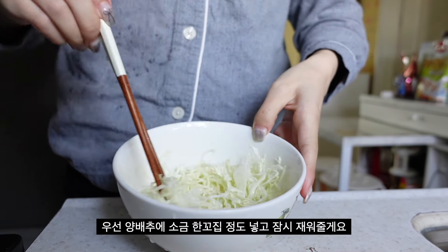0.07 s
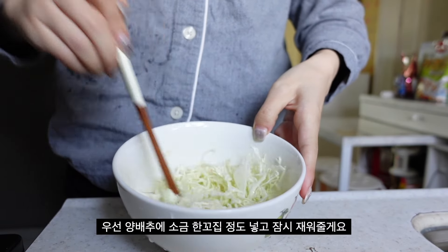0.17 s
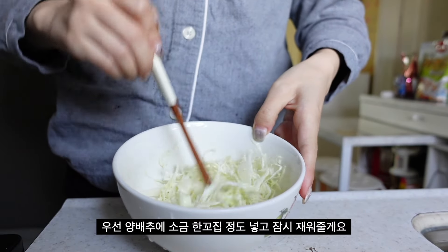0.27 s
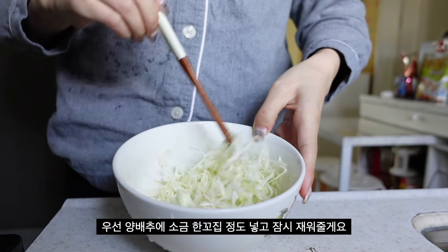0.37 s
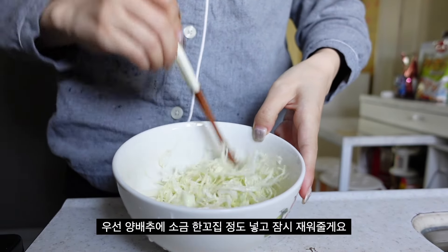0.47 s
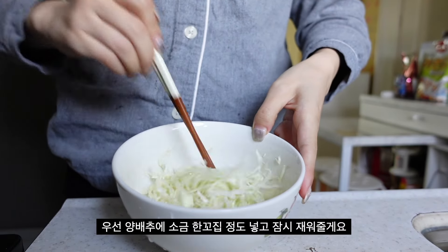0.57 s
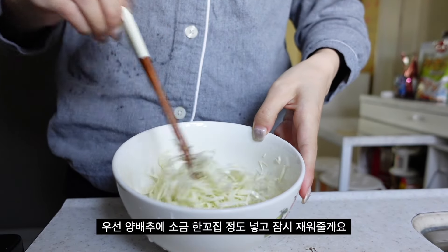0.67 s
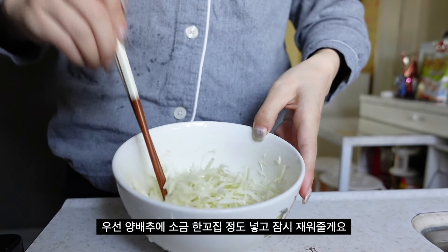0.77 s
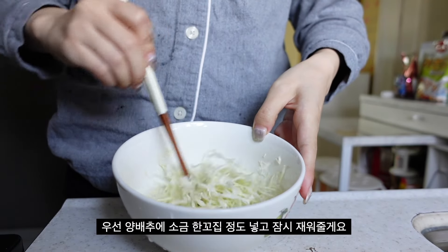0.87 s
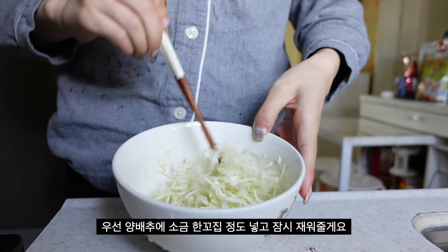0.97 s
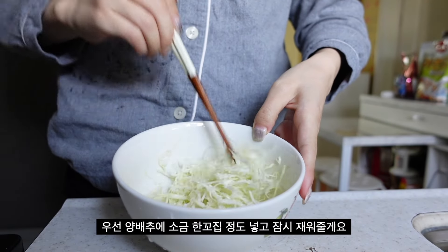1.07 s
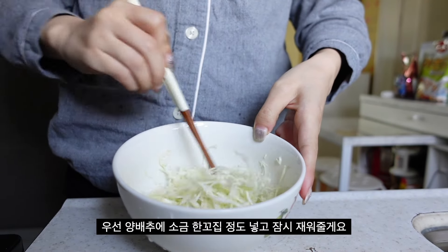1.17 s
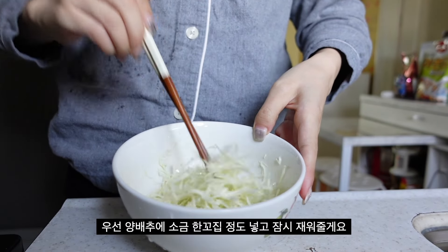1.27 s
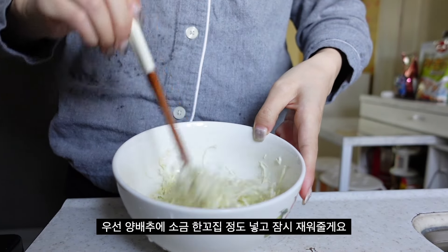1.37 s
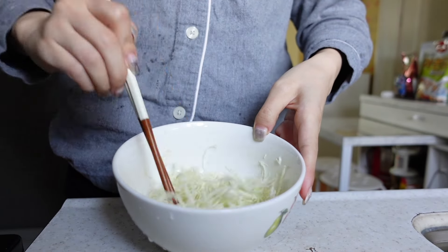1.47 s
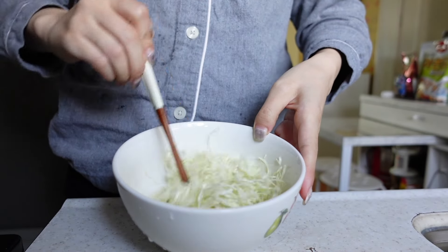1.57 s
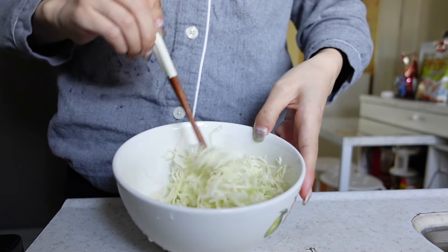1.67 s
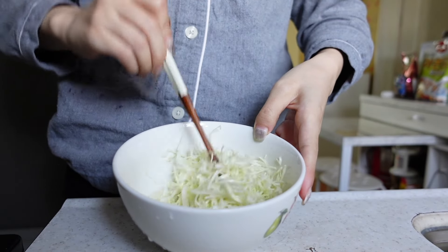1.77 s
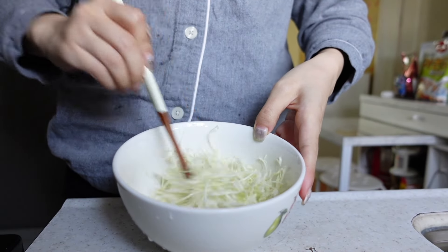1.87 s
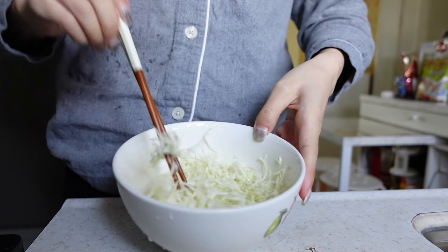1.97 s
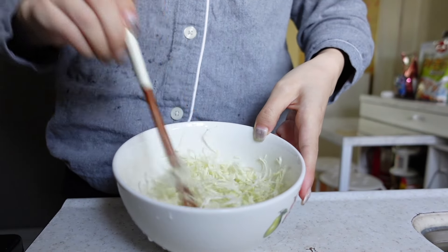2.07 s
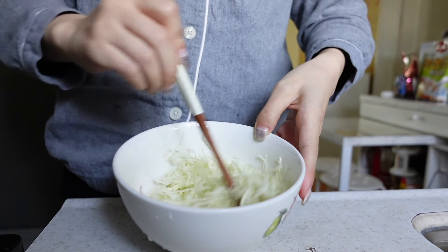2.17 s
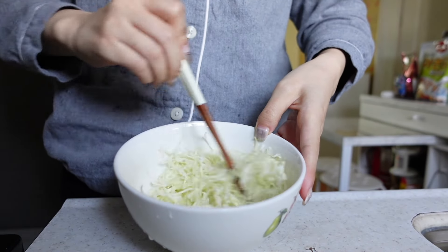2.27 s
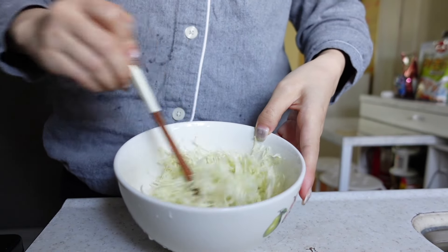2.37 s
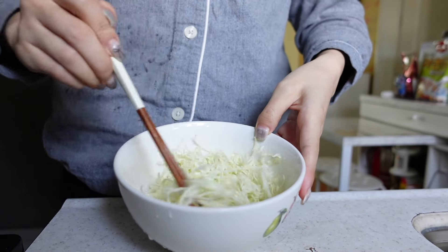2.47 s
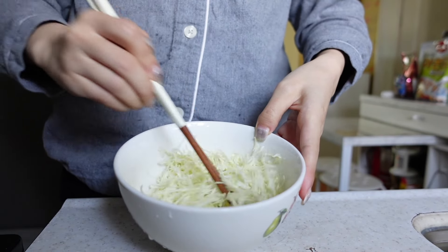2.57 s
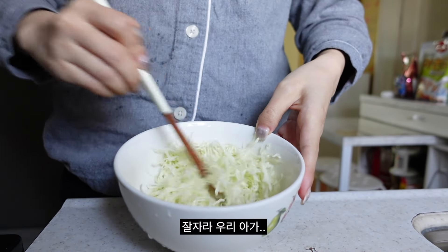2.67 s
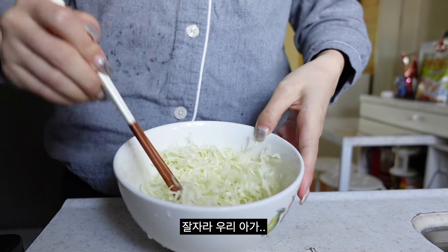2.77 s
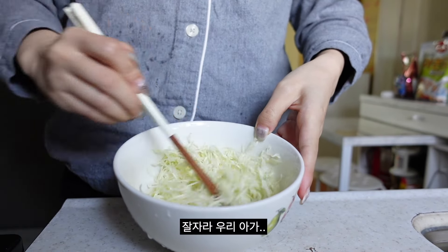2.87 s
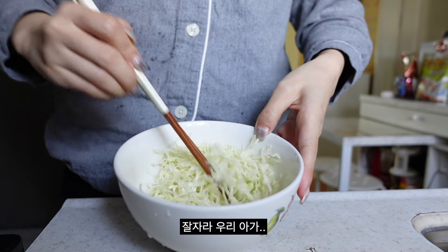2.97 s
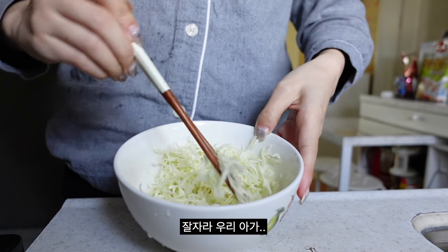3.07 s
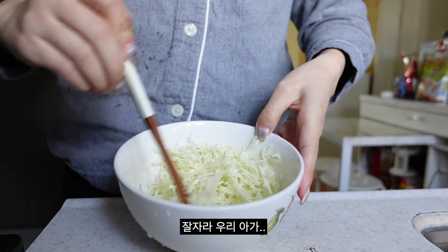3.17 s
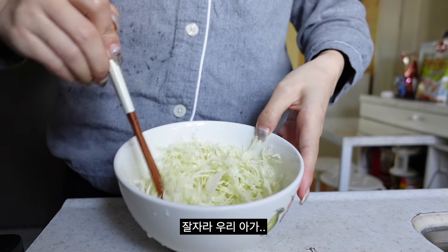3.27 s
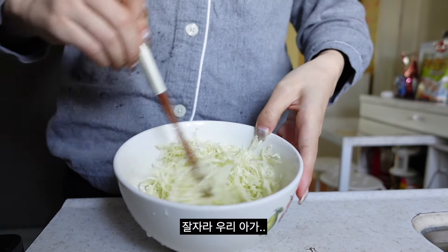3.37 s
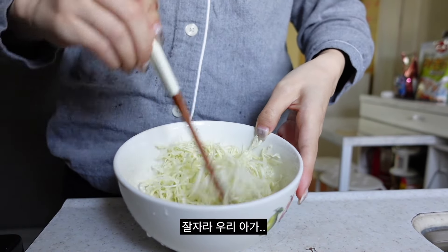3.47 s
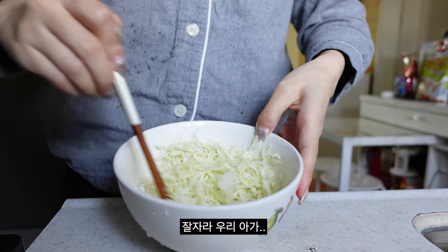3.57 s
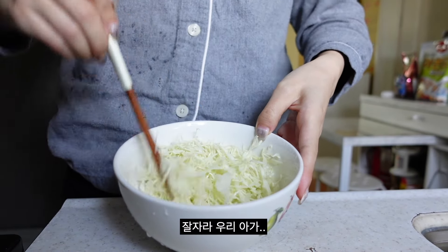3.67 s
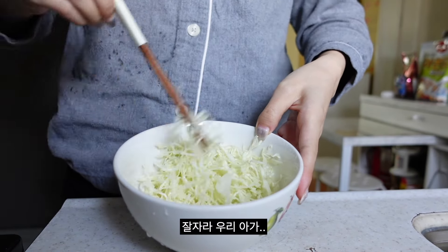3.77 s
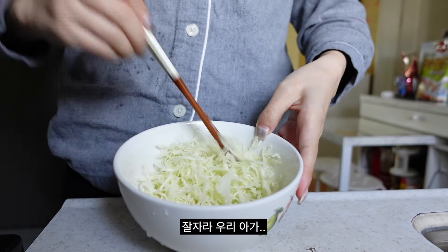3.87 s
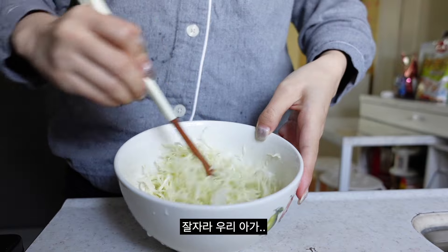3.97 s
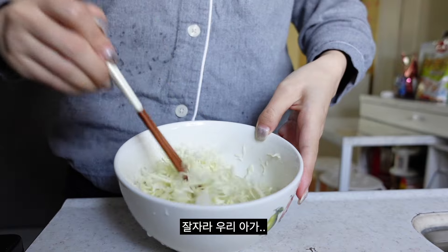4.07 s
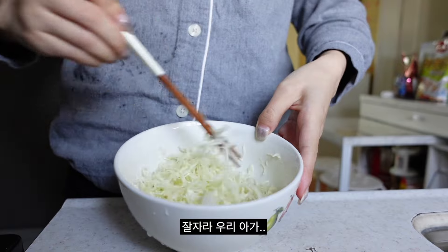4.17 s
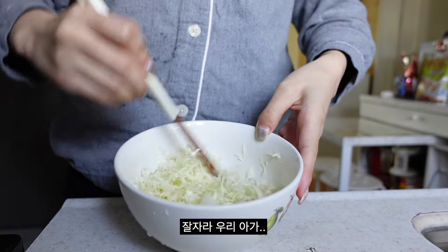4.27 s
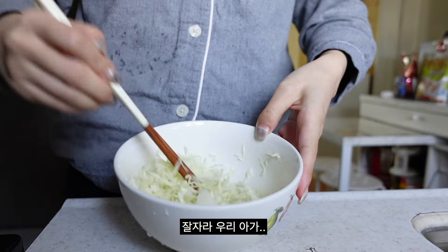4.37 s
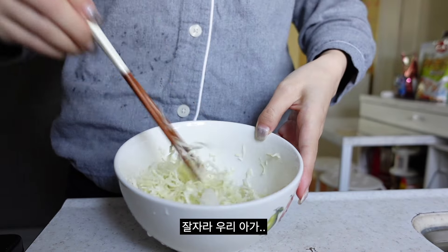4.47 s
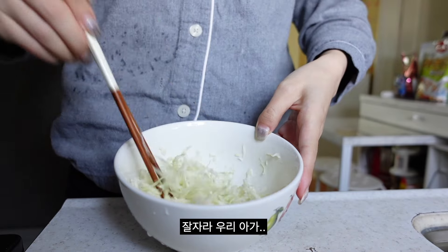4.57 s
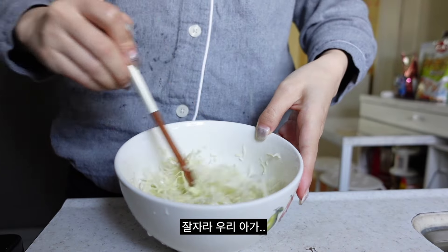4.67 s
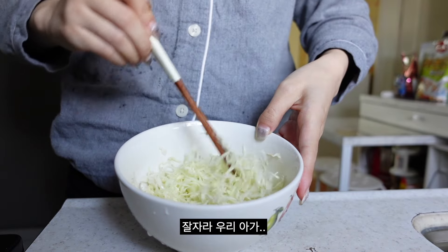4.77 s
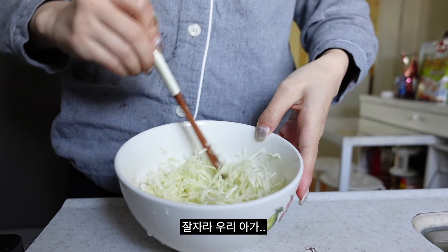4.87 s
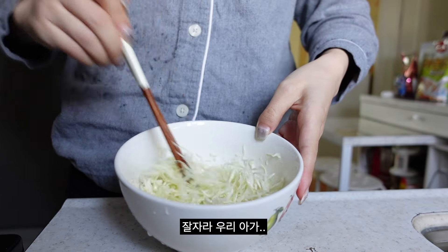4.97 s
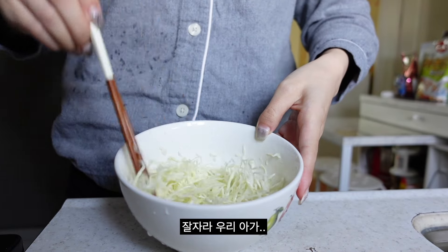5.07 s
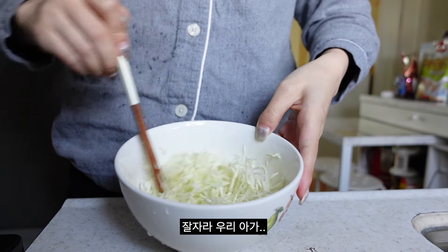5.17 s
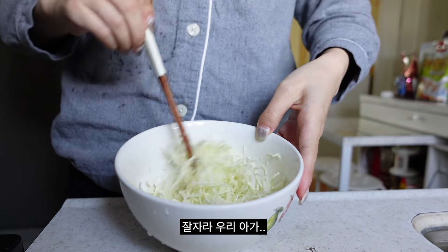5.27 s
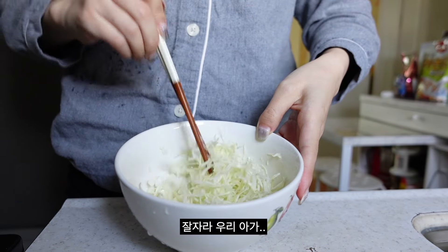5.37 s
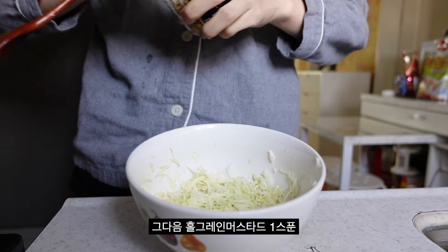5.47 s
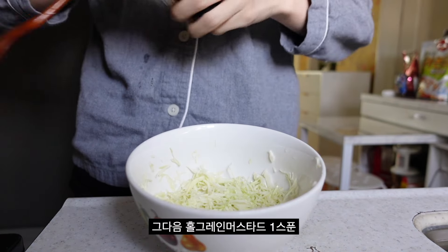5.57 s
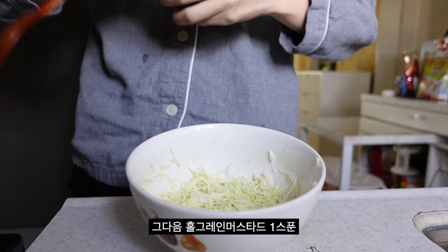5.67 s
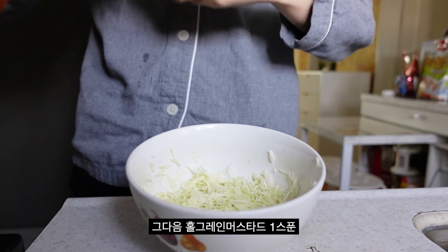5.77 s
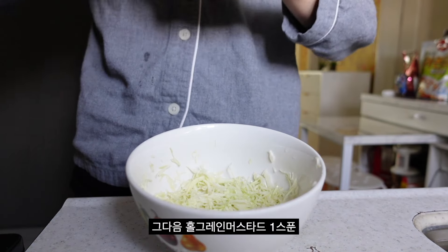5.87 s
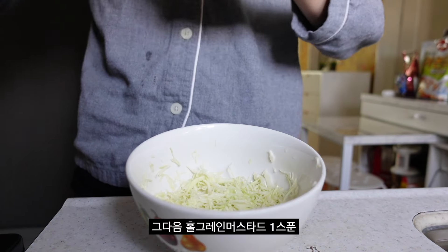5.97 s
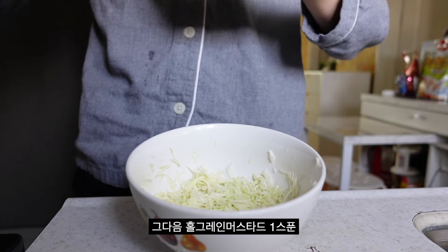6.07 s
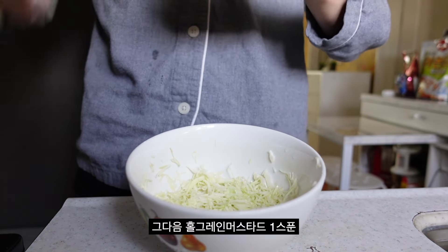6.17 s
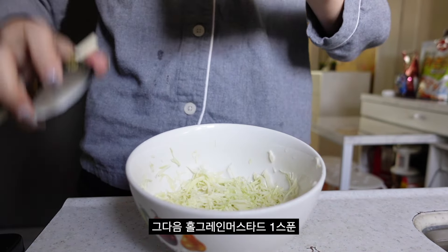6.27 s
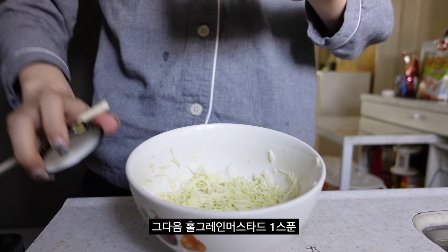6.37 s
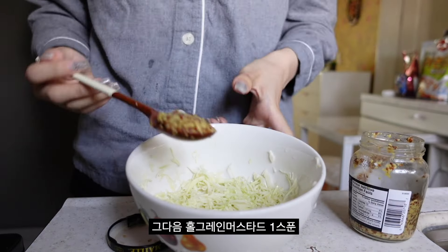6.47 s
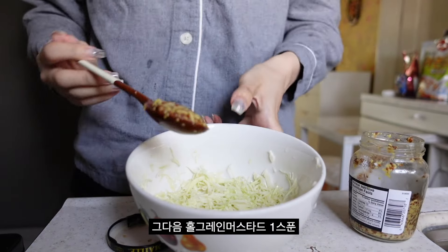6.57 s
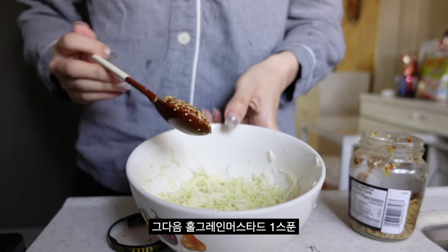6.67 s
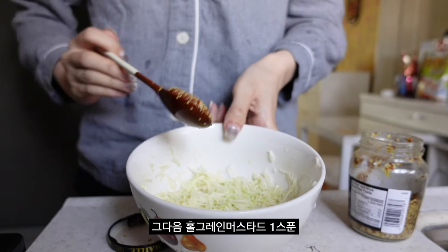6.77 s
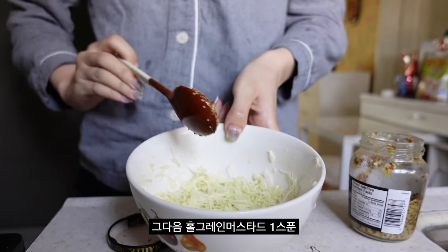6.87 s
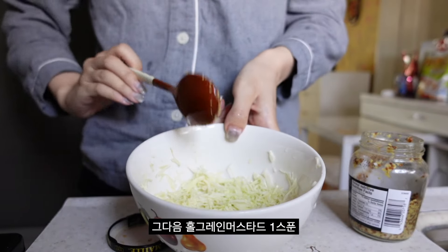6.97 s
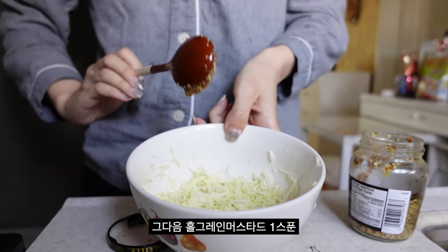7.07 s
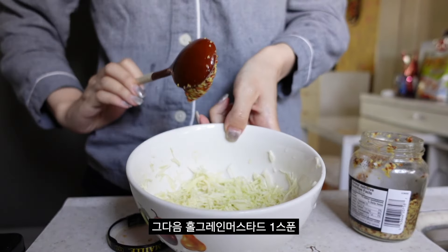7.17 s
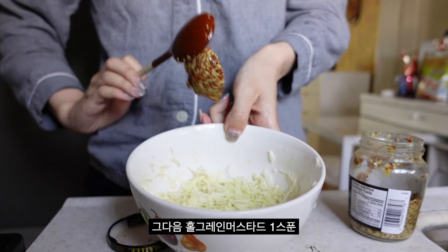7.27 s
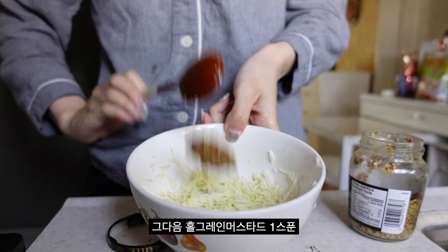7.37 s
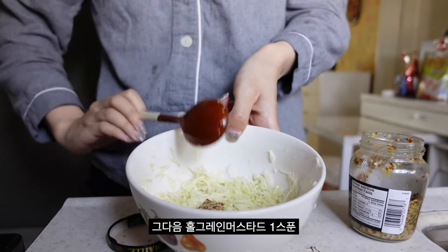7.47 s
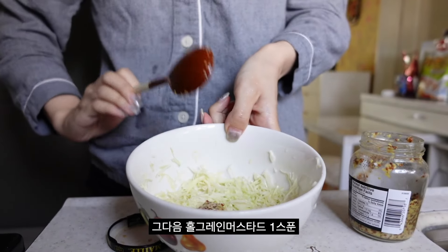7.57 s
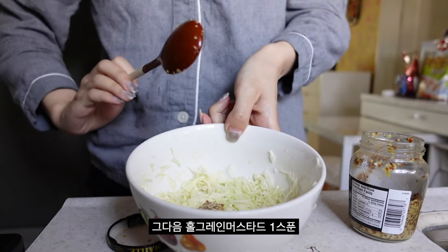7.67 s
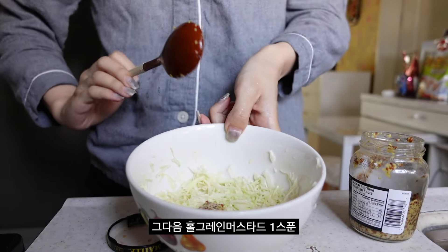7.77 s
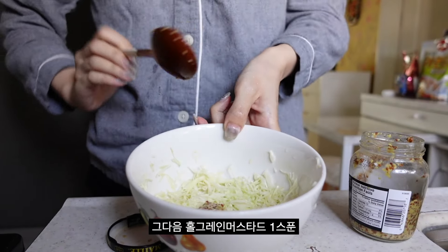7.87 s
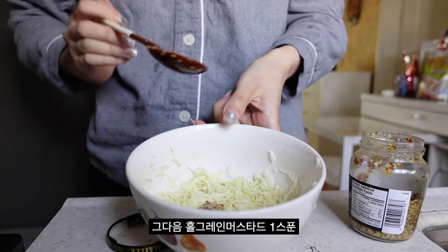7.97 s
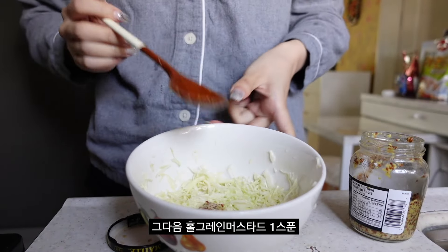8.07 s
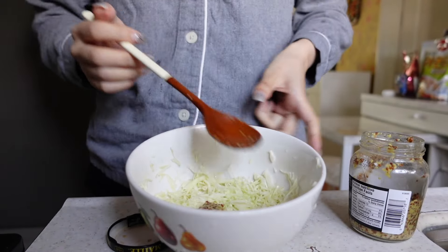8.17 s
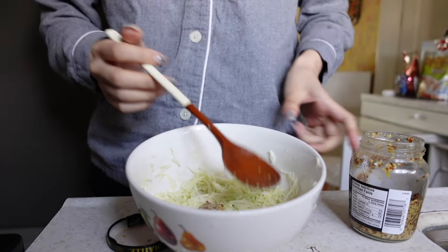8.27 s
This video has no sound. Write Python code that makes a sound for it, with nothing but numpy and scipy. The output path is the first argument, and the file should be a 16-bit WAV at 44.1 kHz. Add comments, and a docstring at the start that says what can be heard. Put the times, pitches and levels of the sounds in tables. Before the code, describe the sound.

A close stereo microphone in a small kitchen, with a low wavering refrigerator hum throughout. From 0 to 5.4 seconds chopsticks toss shredded cabbage in a ceramic bowl: roughly three uneven strokes a second, each a soft crisp crackling swish with faint table rumble. Stick tips tick lightly on the glaze; firmer knocks with short damped ringing and a low thump come near 0.9, 2.9 and 3.2. The bowl's foot skids faintly between 2.2 and 3. At 5.44 the tossing stops abruptly. A jar lid twists at 5.6, loud, metallic and gritty with clustered hollow snaps, then again, weaker and higher, at 5.75 to 5.9. Then mostly fridge hum, with very faint short hollow blips around 6.7, 6.9, 7.2 and 7.7. At 7.5 a spoon knocks the rim once, a clear ceramic clink with a dull table thump and short room echo. Hum continues to about 8.3.

```python
"""Chopsticks toss shredded cabbage in a ceramic bowl: grain noise crackles through air resonances and snips,
stick tips are noise bursts plus ringing modes of bowl and table top, and the bowl's foot skids.
A jar lid is twisted off (grit and snaps through lid and hollow resonances), short soft tones sound,
a spoon knocks the rim. Behind it a fridge hums (wavering sines over coloured noise) in a small kitchen,
heard by a close stereo microphone in two shots with a hard cut after the toss."""
import sys
import numpy as np
from scipy import signal
from scipy.fft import rfft, irfft
from scipy.io import wavfile
from scipy.ndimage import uniform_filter1d

SR = 44100
rng = np.random.default_rng(int(sys.argv[2]) if len(sys.argv) > 2 else 0)


def persist_wave(psi):
    """Save psi, clipped to +-1, as 16-bit WAV."""
    counts = np.round(np.clip(psi, -1, 1) * 32767).astype(np.int16)
    wavfile.write(sys.argv[1], SR, np.atleast_2d(counts).T)


N = 367794
T = np.arange(N) / SR

# Strokes through the shreds. Each row: start in seconds, rise in seconds, hold in seconds,
# fall in dB per second, crackle level in dB, table rumble level in dB.
STROKES = [(-0.1, 0.024, 0.053, 139, -54, -55.5), (0.16, 0.05, 0.092, 120, -54, -52.5),
           (0.454, 0.047, 0.12, 99, -59, -56), (0.741, 0.099, 0.068, 124, -54, -48.5),
           (1.11, 0.045, 0.049, 108, -54, -54), (1.386, 0.066, 0.15, 87, -60.5, -54),
           (1.772, 0.023, 0.082, 108, -55.5, -58), (2.107, 0.083, 0.22, 103, -60, -50.5),
           (2.559, 0.075, 0.06, 87, -57, -46.5), (2.854, 0.035, 0.053, 129, -55.5, -48),
           (3.163, 0.025, .2, 155, -60, -49), (3.541, 0.032, 0.13, 140, -60, -53),
           (3.887, 0.076, 0.082, 133, -56.5, -54.5), (4.281, 0.024, 0.093, 123, -58, -55),
           (4.587, 0.09, 0.022, 113, -53, -59), (4.857, 0.079, 0.02, 188, -54.5, -57.5),
           (5.052, 0.14, 0.15, 306, -60.5, -60.5), (5.381, 0.036, .03, 100, -53.5, -62)]
# Tips crushing a bunch of shreds. Each row: time of the peak in seconds, level in dB.
CRUNCHES = [(.2, -63), (.248, -46.5), (.29, -62), (.4, -64), (0.486, -60), (.512, -55), (.598, -58),
            (1.475, -58), (1.551, -59), (1.6, -58), (1.856, -51), (1.9, -67), (1.952, -58.5), (2.165, -65),
            (2.39, -58), (3.369, -57), (3.57, -80), (4.072, -61), (4.69, -60), (4.97, -48), (5.301, -55.5),
            (5.349, -54.5)]
# Crackle spectrum of the shreds. Each row: frequency in Hz, relative level in dB per Hz.
SHRED_SPECTRUM = [(760, -72), (1300, -14), (1700, -8.5), (1850, -5), (2420, -6.5), (3520, -11), (3780, -5),
                  (4110, -12), (5610, -2.5), (6100, -7.5), (7580, -7.5), (11600, -18.5), (15500, -29.5)]
# Air in the bowl and between the shreds. Each row: frequency in Hz, width in Hz, gain in dB.
AIR_PEAKS = [(2413, 128, 11), (2444, 170, -1), (3740, 31, -2.5), (5570, 840, 0), (7180, 65, 0)]
# Stick tips on the glaze. Each row: time in seconds, tick level in dB, table thump level in dB,
# bowl ring level in dB.
TAPS = [(0.2472, -50, -38.5, -78), (0.2883, -50, -57, -73), (0.4014, -43.5, -66, -76),
        (0.5831, -39.5, -60, -85), (0.63, -40, -70, -83), (0.8622, -27, -31.5, -50.5),
        (1.1521, -41, -47.5, -71), (1.215, -40, -61, -72), (1.8005, -42, -65, -77),
        (2.2269, -48.5, -44, -62), (2.2573, -42, -67, -76), (2.6726, -42, -37, -65),
        (2.873, -28, -31.5, -55), (2.9393, -44, -65, -69), (3.1743, -28.5, -36.5, -47.5),
        (3.5674, -48, -39.5, -78), (3.6013, -45.5, -53, -67), (3.8012, -43.5, -66, -78),
        (3.9407, -39, -43.5, -69), (4.3044, -42.5, -49, -58), (4.6229, -47.5, -59, -69),
        (4.9242, -54, -47, -82), (5.4086, -64, -54, -80)]
# Spectrum of a tick. Each row: frequency in Hz, gain in dB.
TICK_SPECTRUM = [(400, -27.5), (1000, -11), (2400, -5.5), (3500, -13), (5000, -6.5), (7200, -2),
                 (10000, -14), (15500, -27)]
# Bowl modes. Each row: frequency in Hz, relative level in dB, T60 in seconds before damping.
BOWL_MODES = [(955, -3, .12), (983, -2, .3), (1010, -8, .2), (1087, -10, .25), (2089, -11, .2),
              (2159, -11, .2), (2573, 0, .7), (2614, -6, .4), (2654, -4, .25), (2832, -12, .3),
              (4657, -4, .45), (4690, -4, .2), (4725, -2, .15), (7278, -12, .15)]
# Table top modes. Each row: frequency in Hz, relative level in dB, T60 in seconds before damping.
TABLE_MODES = [(115, -21.5, 0.21), (152.9, -0.2, 0.23), (184, -11, 0.14), (217.6, 3.5, 0.087),
               (287, -9, 0.15), (340.5, -19, 0.27), (371.6, -13, 0.21), (466.6, -18, 0.077),
               (496, -12, 0.063), (528, -14.5, 0.099), (620.5, -24, 0.13)]
# Rattle of bowl on table. Each row: frequency in Hz, gain in dB.
THUD_SPECTRUM = [(150, -5), (300, -3), (500, 2), (900, 1.5), (1400, -15.5), (2500, -4.5), (6000, -18.5)]
# Frequencies in Hz at which the shares of the bowl ring below hold.
RING_HZ = [1000, 2600, 4700]
# Share of the ring in dB at those frequencies: tips strike low in the bowl, the spoon its rim.
INSIDE_SHARE_DB = [8.5, -45, 4.5]
RIM_SHARE_DB = [2, -0.5, -5]
# The bowl's foot skidding on the table. Each row: start in seconds, rise in seconds, hold in seconds,
# fall in dB per second, level in dB.
SKIDS = [(2.21, 0.011, 0.017, 300, -63), (2.341, .015, 0.034, 300, -59.5), (2.66, 0.012, 0.056, 300, -55.5),
         (2.894, .015, .03, 296, -63.5), (2.954, 0.016, 0.025, 300, -58.5)]
# Foot resonances. Each row: frequency in Hz, width in Hz, gain in dB.
FOOT_PEAKS = [(330, 51, 3), (544, 71, -4), (780, 96, -3.5)]
# Lid sliding on its thread. Each row: start in seconds, rise in seconds, hold in seconds,
# fall of the metal in dB per second, metal level in dB, hollow level in dB.
TWISTS = [(5.581, 0.038, 0.03, 342, -23, -28), (5.758, 0.015, 0.07, 398, -35, -34)]
# Lid snapping over the thread. Each row: time in seconds, then dB of the blow to lid, crack and hollow.
SNAPS = [(5.6084, -9, -24.5, -14), (5.6211, -12, -18, -16), (5.6289, 6.5, -29.5, 1),
         (5.647, -24, -36, -7.5), (5.6712, 4, -31, 6.5), (5.7728, -6.5, -52, -16),
         (5.79, -4.5, -51.5, -8.5), (5.8134, -5, -53.5, -37), (5.8586, 0.5, -27, -3.5),
         (5.8825, -34, -39.5, -12.5), (6.164, -55, -50, -49)]
# Lid and jar resonances. Each row: frequency in Hz, width in Hz, gain in dB.
LID_PEAKS = [(1450, 125, -11.5), (1960, 190, -14), (2478, 99, -0.5), (2730, 144, -3.5), (3260, 55, -15.5),
             (4470, 120, -8), (5200, 150, -16)]
# Jar hollow, rising as the lid lifts: one list per twist. Each row: frequency in Hz, width in Hz, gain in dB.
HOLLOW_PEAKS = [
    [(330, 170, -9), (786, 52, -3.5)],
    [(470, 65, -3.5), (877, 41, 4)],
]
# Crack spectrum. Each row: frequency in Hz, gain in dB.
CRACK_SPECTRUM = [(1000, -38), (2500, -9.5), (4500, 1.5), (6500, -10), (9000, -16.5), (15500, -33.5)]
# Spoon on the rim. Each row: time in seconds, tick level in dB, table thump level in dB, bowl ring level in dB.
SPOON = [(7.4809, -14, -18.5, -32)]
# Short hollow blips. Each row: start in seconds, level in dB, frequency in Hz.
BLIPS = [(6.709, -52, 644), (6.906, -57, 653), (6.947, -60, 630), (7.167, -56, 659), (7.671, -49.5, 644)]
# Fridge level in each shot. Each row: time in seconds, hum level in dB, motor noise level in dB.
FRIDGE_LEVELS = [(0, -53, -60.5), (5.44, -52, -60), (5.445, -74, -61), (5.6, -56.5, -57.5),
                 (6.5, -57.5, -60.5), (8.34, -57, -59)]
# Compressor lines. Each row: frequency in Hz, relative level in dB while tossing, relative level in dB afterwards.
HUM_LINES = [(59.7, -19.5, -17), (117.7, 1, 2.5), (209.5, -16.5, -16.5), (291, -11.5, -20),
             (345, -19, -37.5), (353, -27, -33), (403.5, -19.5, -31)]
# Motor noise spectrum. Each row: frequency in Hz, relative level in dB per Hz.
MOTOR_SPECTRUM = [(18, -53), (30, -30.5), (64, -17), (92, -8.5), (123, -4.5), (168, -10.5), (369, -11.5),
                  (455, -23.5), (897, -19.5), (1080, -19), (1870, -36), (2620, -34.5), (2990, -39.5),
                  (13600, -51), (15500, -56)]
# Stereo width of the motor noise. Each row: frequency in Hz, side minus mid in dB.
MOTOR_WIDTH = [(100, -63), (250, -10.5), (500, -7), (1000, 1.5), (3000, 1), (10000, -4.5)]
# Stereo lean of the direct sound. Each row: frequency in Hz, side minus mid in dB.
LEAN = [(150, -45), (300, -30), (600, -16), (1200, -19), (2500, -25), (5000, -28), (9000, -18),
        (14000, -21)]
# Stereo width of the echoes. Each row: frequency in Hz, side minus mid in dB.
ECHO_WIDTH = [(150, -38), (300, -10.5), (600, -3.5), (2500, -4), (5000, -2.5), (9000, 4.5), (14000, 4.5)]

CUT_S, LIFT_S = 5.442, 5.76  # cut to the second shot; second twist takes over the hollow
RISE_DB = 22.5  # depth of every rise
DIG_DB, DIG_S = 4.5, 0.0067  # extra crunch as the tips go in, and its fading
SLACK_DB, SLACK_AFTER_S, SLACK_S = 5, 0.038, 0.033  # a lull between the dig and the lift
CRUNCH_S = 0.0036
# the table answers each stroke
SHAKE_LAG_S, SHAKE_RISE_S, SHAKE_FALL_DB_PER_S, REST_DB = 0.035, 0.12, 81.5, -70
HOLLOW_FALL_DB_PER_S = 205
GRIT_DB = -15  # unrung part of the grit
ROOM_T60_S, TREBLE_T60_S, ROOM_DB, ROOM_SPLIT_HZ = 0.43, 0.097, -9.5, 3000
ECHO_FROM_HZ, TOP_HZ = 294, 15500


def toss():
    """Shreds crackle in patches; the tips scrape the glaze and shake the table."""
    sweep, shake = strokes()
    patchy = grains(7000, 0.23) * undb(1.6 * walk(70))
    crackle = unit(colour(patchy, SHRED_SPECTRUM))
    # every pocket of air is set off by its own crunches
    pockets = [resonate(grains(900, 3.8) * undb(4 * walk(60)), [peak_row]) for peak_row in AIR_PEAKS]
    air = unit(sum(pockets))
    scrape = grains(60, 7.2) * sweep
    glaze = unit(signal.fftconvolve(scrape, ring(BOWL_MODES, 0, damp=0.53))[:N])
    shaking = grains(600, 3.3)
    table = unit(signal.fftconvolve(shaking, ring(TABLE_MODES, 0, damp=0.42))[:N])
    rumble = table + undb(-21.5) * unit(colour(shaking, THUD_SPECTRUM))
    shreds = undb(-4) * crackle + undb(-5) * air + undb(-8) * snips(45, 2.6)
    return sweep * shreds + undb(-77.5) * glaze + shake * rumble


def strokes():
    """Gains of crackle and rumble: a crunch as the tips dig in, a sweep, a settling."""
    crackle, rumble = 0, undb(REST_DB)
    for start_s, rise_s, hold_s, fall, db, rumble_db in STROKES:
        since_dig = T - start_s - rise_s
        dig_db = DIG_DB * np.exp(-np.abs(since_dig) / DIG_S)
        slack_db = SLACK_DB * np.exp(-((since_dig - SLACK_AFTER_S) / SLACK_S) ** 2)
        crackle = crackle + undb(dig_db - slack_db) * swell(start_s, rise_s, hold_s, fall, db)
        shake_s = start_s + rise_s + SHAKE_LAG_S - SHAKE_RISE_S
        rumble = rumble + swell(shake_s, SHAKE_RISE_S, 0, SHAKE_FALL_DB_PER_S, rumble_db)
    crunch = sum(undb(db) * np.exp(-np.abs(T - s) / CRUNCH_S) for s, db in CRUNCHES)
    return crackle + crunch, rumble


def snips(rate_hz, spread_db):
    """Single shreds breaking: short blips, each size of shred with its own pitch."""
    out = np.zeros(N)
    for hz in 2000 * 2 ** np.arange(0, 2.3, 0.2):
        size = [(hz, hz / 8, -2.5 * np.log2(hz / 2000))]
        out += resonate(resonate(grains(rate_hz, spread_db), size), size)
    return unit(out)


def taps():
    """Stick tips land inside the bowl, where the shreds damp the ring."""
    return blows(TAPS, INSIDE_SHARE_DB, contact_ms=1.7, tilt_db_per_octave=0.76, air_db=5.3, damp=0.35)


def blows(table, share_db, contact_ms, tilt_db_per_octave, air_db, damp):
    """Each blow: a tick on the glaze, the ring of the bowl, a thump that builds up in the table."""
    out = np.zeros(N)
    tilt = [(500, -2 * tilt_db_per_octave), (8000, 2 * tilt_db_per_octave)]
    for start_s, tick_db, thump_db, ring_db in table:
        contact = burst(contact_ms)
        tick = colour(contact, TICK_SPECTRUM) + undb(air_db) * resonate(contact, AIR_PEAKS)
        tick = colour(tick, tilt)
        thump = ring(TABLE_MODES, 0.5)
        thump = peak(thump * (1 - np.exp(-T[:len(thump)] / 0.003)))
        add(thump, 0, undb(-14) * peak(colour(burst(32), THUD_SPECTRUM)))
        struck = [(hz, db + ring_db + np.interp(hz, RING_HZ, share_db), t60) for hz, db, t60 in BOWL_MODES]
        add(out, start_s, undb(tick_db) * peak(tick))
        add(out, start_s, ring(struck, 0.6, damp))
        add(out, start_s + 0.00219, undb(thump_db) * thump)
    return out


def skids():
    """The unglazed foot judders over the table top."""
    return unit(resonate(grains(500, 3.1), FOOT_PEAKS)) * sum(swell(*row) for row in SKIDS)


def lid():
    """Stick-slip grit and snaps ring the metal lid and the hollow of the jar."""
    grit = grains(5000, 0.85) * undb(5.5 * walk(90))
    metal, dull = np.zeros(N), np.zeros(N)
    for start_s, rise_s, hold_s, fall, metal_db, hollow_db in TWISTS:
        metal += grit * swell(start_s, rise_s, hold_s, fall, metal_db)
        dull += grit * swell(start_s, rise_s, hold_s, HOLLOW_FALL_DB_PER_S, hollow_db)
    crack = undb(GRIT_DB) * metal
    click = np.ones(2)
    for start_s, ring_db, crack_db, hollow_db in SNAPS:
        add(metal, start_s, undb(ring_db) * click)
        add(crack, start_s, undb(crack_db) * burst(2.0))
        add(dull, start_s, undb(hollow_db) * click)
    hollow = resonate(dull * (T < LIFT_S), HOLLOW_PEAKS[0])
    hollow = hollow + resonate(dull * (T >= LIFT_S), HOLLOW_PEAKS[1])
    return resonate(metal, LID_PEAKS) + colour(crack, CRACK_SPECTRUM) + hollow


def spoon():
    """The broad spoon lands on the free rim, outside the bowl's air, with a duller tick."""
    knock = blows(SPOON, RIM_SHARE_DB, contact_ms=1.0, tilt_db_per_octave=-5.1, air_db=-38, damp=0.49)
    return colour(knock, [(4700, 0.0), (7000, -10), (14000, -16.5)])


def blips():
    """Short hollow sine tones with a soft onset and an exponential decay."""
    out, t = np.zeros(N), T[:6000]
    shape = peak(np.exp(-t / 0.009) * (1 - np.exp(-t / 0.004)))
    for start_s, db, hz in BLIPS:
        add(out, start_s, undb(db) * shape * np.sin(2 * np.pi * hz * t))
    return out


def fridge():
    """Wavering compressor lines over motor noise whose stereo width varies with pitch."""
    hum_db, motor_db = curves(FRIDGE_LEVELS)
    hum = np.zeros(N)
    for hz, tossing_db, later_db in HUM_LINES:
        line_db = np.where(T < CUT_S, tossing_db, later_db) + 1.1 * walk(11)
        hum += undb(line_db) * np.sin(2 * np.pi * hz * T + 0.51 * walk(5.5))
    mid = colour(rng.standard_normal(N), MOTOR_SPECTRUM)
    side = colour(colour(rng.standard_normal(N), MOTOR_SPECTRUM), MOTOR_WIDTH)
    motor = np.array([undb(-1.0) * (mid + side), undb(-2.77) * (mid - side)]) / np.std(mid)
    return undb(hum_db) * hum + undb(motor_db) * motor


def heard(near):
    """Direct sound and echoes; small things send no deep bass, the echoes carry little bass."""
    near = signal.sosfilt(signal.butter(3, 105, "high", fs=SR, output="sos"), near)
    echoing = signal.lfilter(*signal.butter(1, ECHO_FROM_HZ, "high", fs=SR), near)
    return spread(near) + room(echoing)


def spread(x):
    """The left port faces the table: a coloured copy is added left and taken away right."""
    side = colour(x, LEAN)
    return np.array([x + side, x - side])


def room(x):
    """Kitchen echoes: decaying noise whose treble dies first, unlike left and right above the bass."""
    t = T[:SR // 2]
    tails = []
    for _ in range(2):
        noise = rng.standard_normal(len(t))
        low = signal.lfilter(*signal.butter(1, ROOM_SPLIT_HZ, fs=SR), noise)
        tail = low * undb(-60 * t / ROOM_T60_S) + (noise - low) * undb(-60 * t / TREBLE_T60_S)
        tails.append(unit(tail * (1 - np.exp(-t / 0.00081))) / np.sqrt(len(t)))
    mid, side = (signal.fftconvolve(x, tail)[:N] for tail in tails)
    side = colour(side, ECHO_WIDTH)
    return undb(ROOM_DB) * np.array([mid + side, mid - side])


def undb(db):
    """Amplitude of a level in dB."""
    return 10 ** (np.asarray(db) / 20)


def unit(x):
    """Scale to an RMS of 1."""
    return x / np.sqrt(np.mean(x ** 2))


def peak(x):
    """Scale to a peak of 1."""
    return x / np.max(np.abs(x))


def add(out, start_s, x):
    """Mix x into out at start_s, cut at the end of out."""
    i = int(start_s * SR)
    out[i:i + len(x)] += x[:len(out) - i]


def curves(table):
    """Columns of a table joined by straight lines over its first column, -120 outside it."""
    s, *columns = np.transpose(table)
    return [np.interp(T, s, c, left=-120, right=-120) for c in columns]


def swell(start_s, rise_s, hold_s, fall_db_per_s, db):
    """Gain that climbs to db, holds and falls away; silent before."""
    t = T - start_s
    rise_db = np.minimum(RISE_DB * (t / rise_s - 1), 0)
    fall_db = fall_db_per_s * np.maximum(t - rise_s - hold_s, 0)
    return undb(db + rise_db - fall_db) * (t > 0)


def walk(rate_hz):
    """Random levels held 1 / rate_hz seconds and smoothed twice; RMS 1."""
    k = int(SR / rate_hz)
    steps = np.repeat(rng.standard_normal(N // k + 1), k)
    return unit(uniform_filter1d(uniform_filter1d(steps, k), k)[:N])


def grains(rate_hz, spread_db):
    """Random clicks of either sign at a mean rate; a larger spread makes a few stand out; RMS 1."""
    hit = rng.random(N) < rate_hz / SR
    size = np.minimum(rng.exponential(size=N), 4)
    return unit(hit * rng.standard_normal(N) * undb(spread_db * size))


def burst(decay_ms):
    """A decaying puff of noise, as of a rough contact."""
    t = T[:12000]
    return rng.standard_normal(len(t)) * np.exp(-t * 1000 / decay_ms)


def ring(modes, scatter_db, damp=1.0):
    """One blow on a set of decaying sine modes, their levels scattered at random; damp scales T60."""
    hz, db, t60_s = np.array(modes, float).T[:, :, None]
    t = T[:SR * 3 // 4]
    db = db + scatter_db * rng.standard_normal(db.shape)
    sign = (-1.0) ** np.arange(len(hz))[:, None]
    return np.sum(sign * undb(db - 60 * t / (t60_s * damp)) * np.sin(2 * np.pi * hz * t), axis=0)


def resonate(x, peaks):
    """Parallel resonances of alternating sign."""
    out = np.zeros(len(x))
    for k, (hz, width_hz, db) in enumerate(peaks):
        out += (-1) ** k * undb(db) * signal.lfilter(*signal.iirpeak(hz, hz / width_hz, SR), x)
    return out


def colour(x, spectrum):
    """Causal minimum-phase filter through (Hz, dB) points, from the cepstrum of the log gain."""
    hz, db = np.transpose(spectrum)
    grid_hz = np.maximum(np.arange(2049) * SR / 4096, 1)
    cepstrum = irfft(np.log(undb(np.interp(np.log(grid_hz), np.log(hz), db))))
    # fold the anticausal half onto the causal one
    cepstrum[1:2048] *= 2
    cepstrum[2049:] = 0
    return signal.fftconvolve(x, irfft(np.exp(rfft(cepstrum))))[:len(x)]


def scene():
    """First shot: the toss; second shot: lid, blips and spoon; the fridge runs through both."""
    tossing = heard(toss() + taps() + skids()) * (T < CUT_S)  # ends abruptly, echoes too
    return tossing + heard(lid() + blips() + spoon()) + fridge()


def record(dry):
    """The recorder cuts the top: a steep elliptic low-pass."""
    return signal.sosfilt(signal.ellip(10, 0.2, 90, TOP_HZ, fs=SR, output="sos"), dry)


dry = scene()
out = record(dry)
persist_wave(out)
```